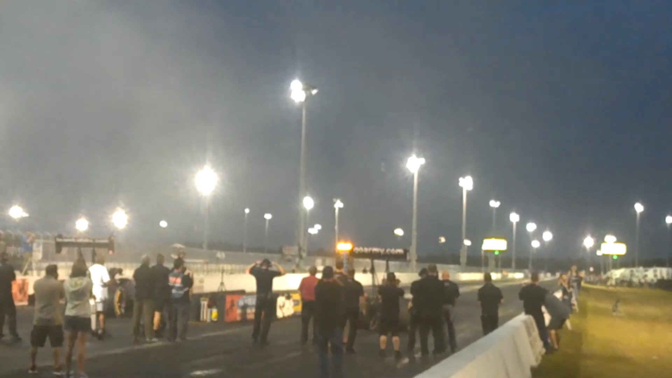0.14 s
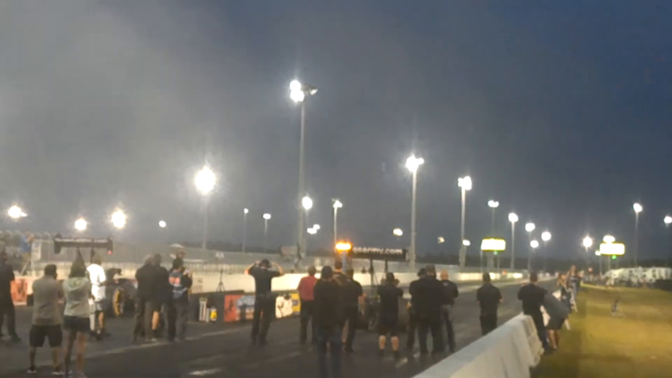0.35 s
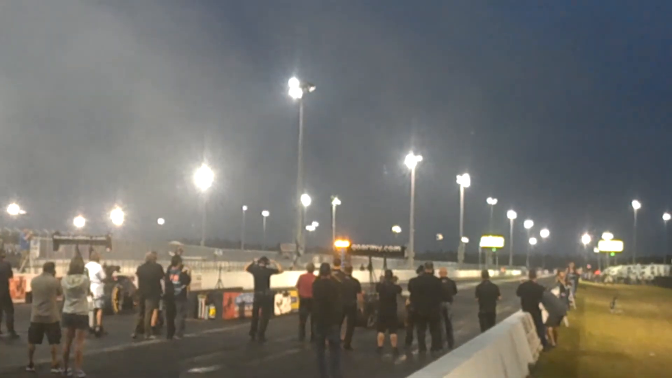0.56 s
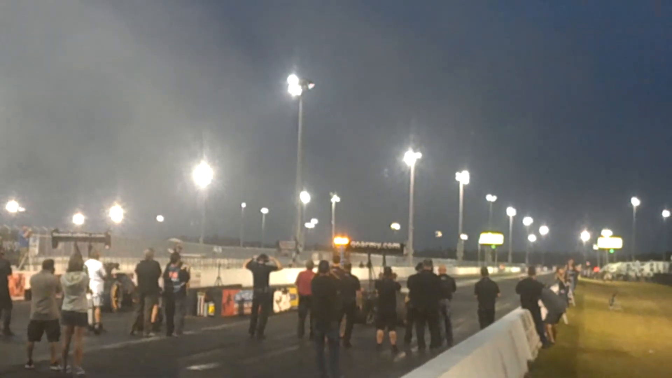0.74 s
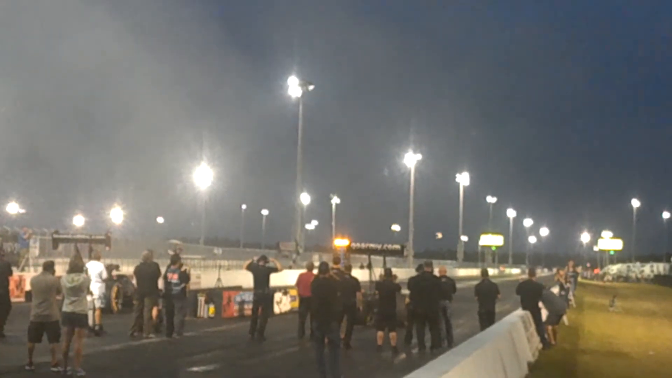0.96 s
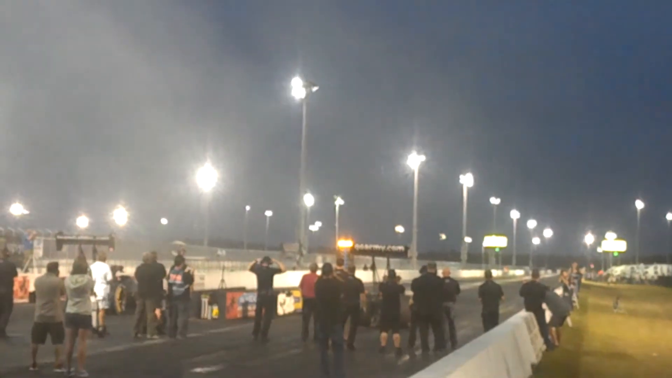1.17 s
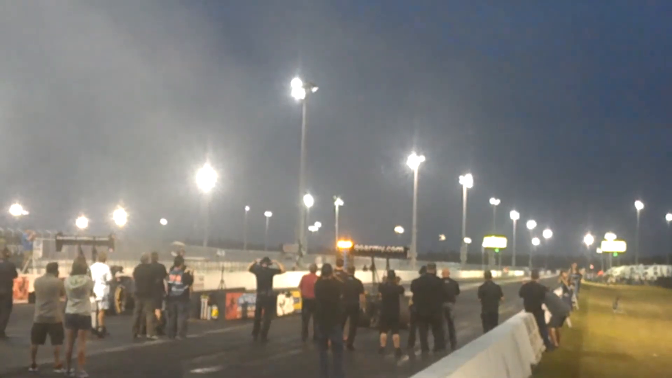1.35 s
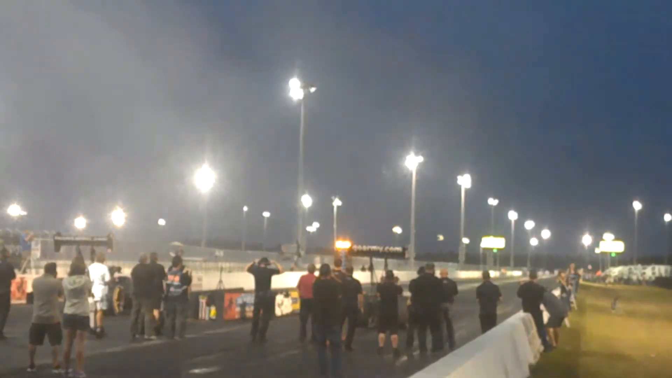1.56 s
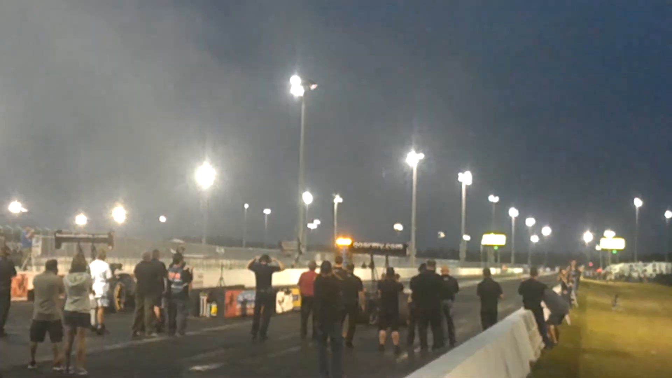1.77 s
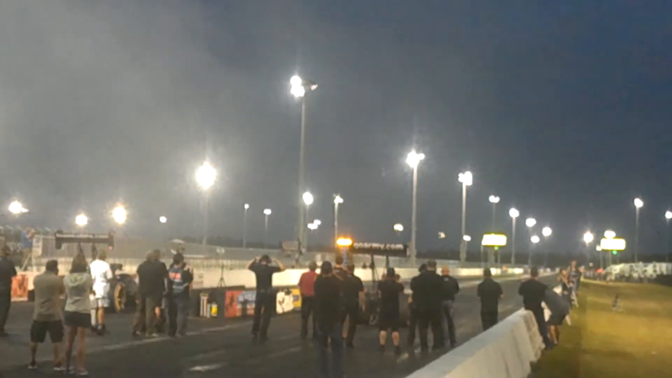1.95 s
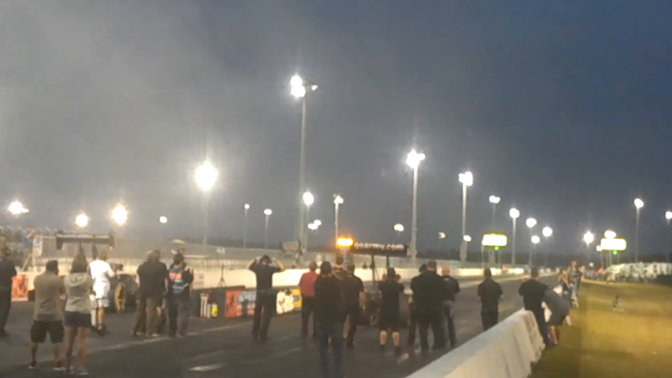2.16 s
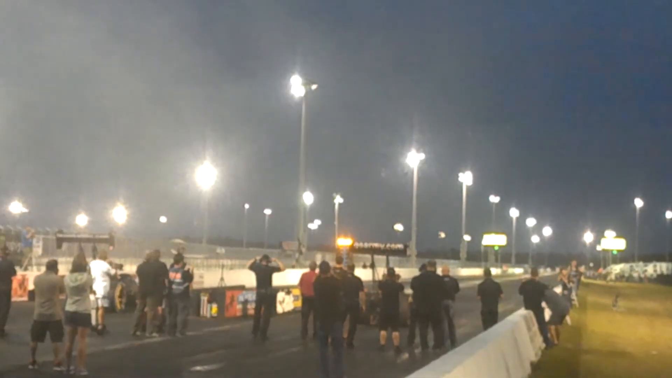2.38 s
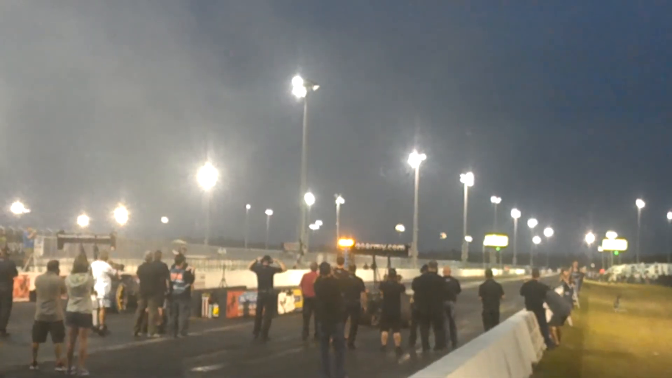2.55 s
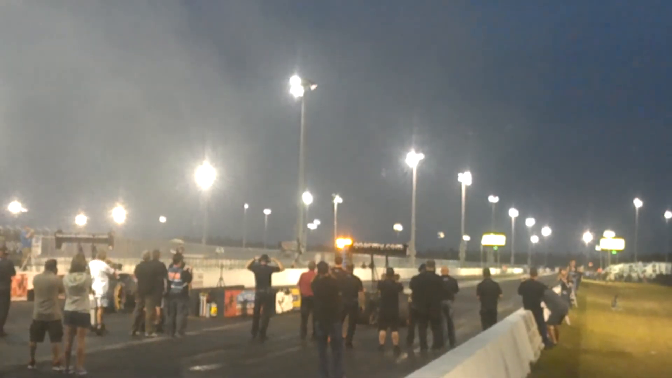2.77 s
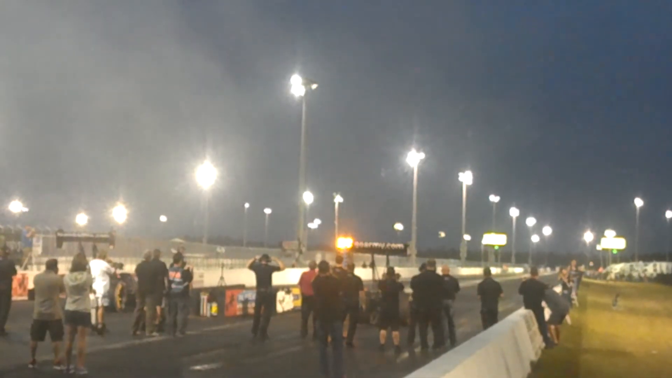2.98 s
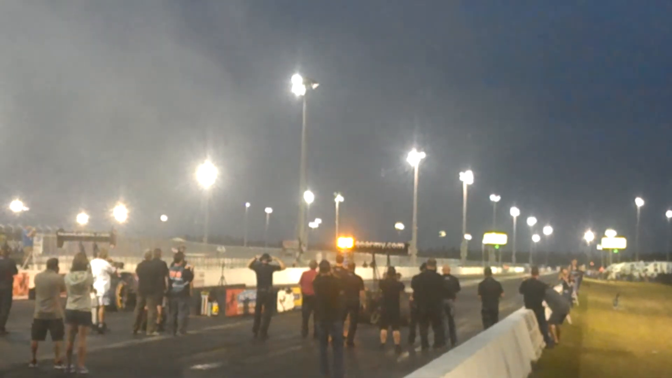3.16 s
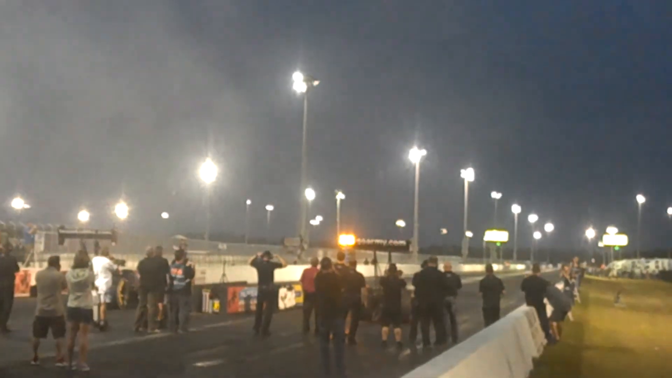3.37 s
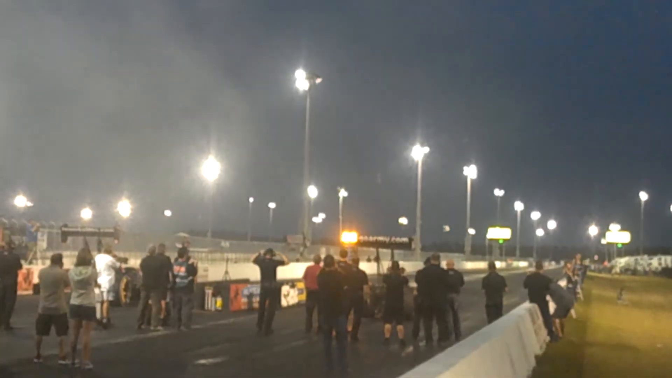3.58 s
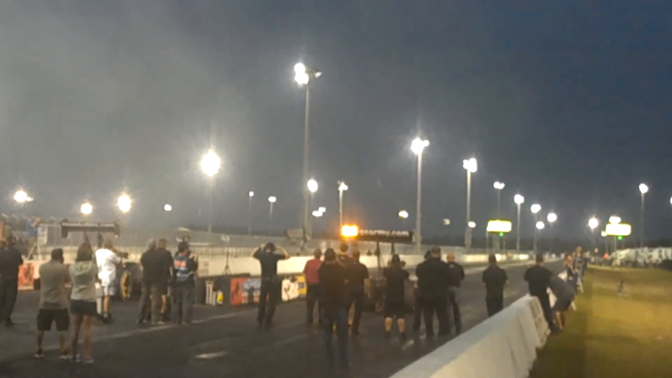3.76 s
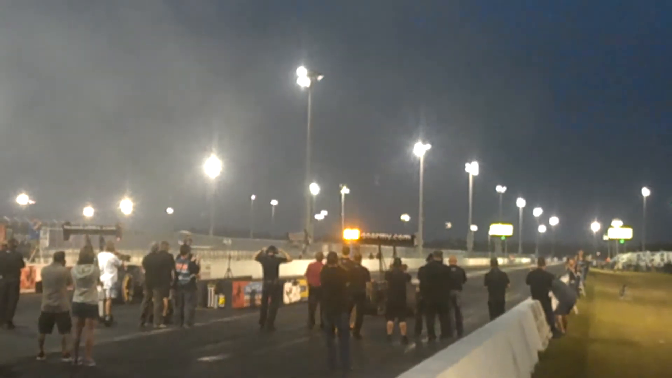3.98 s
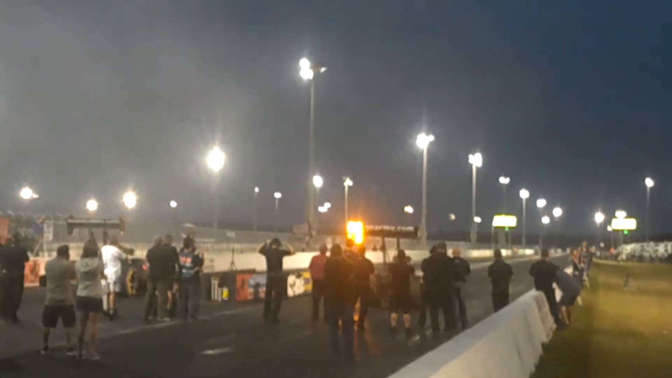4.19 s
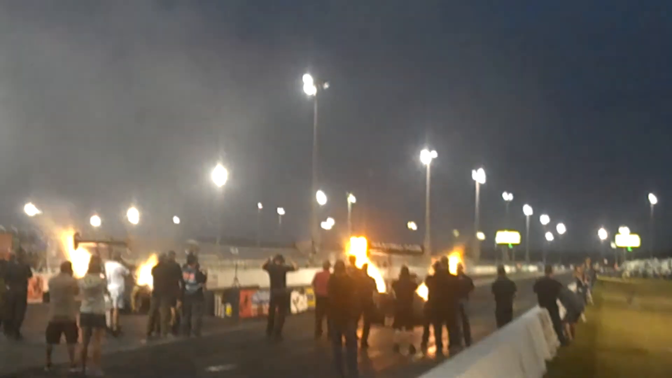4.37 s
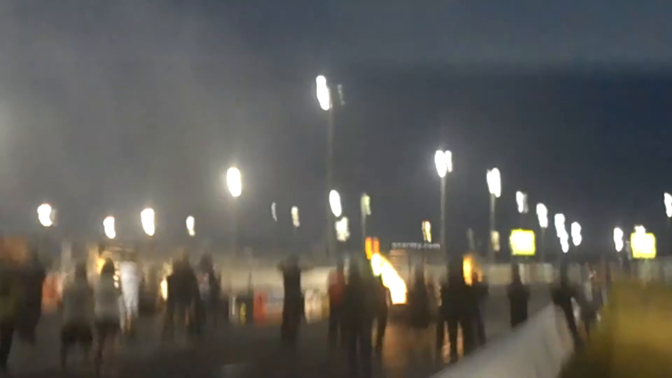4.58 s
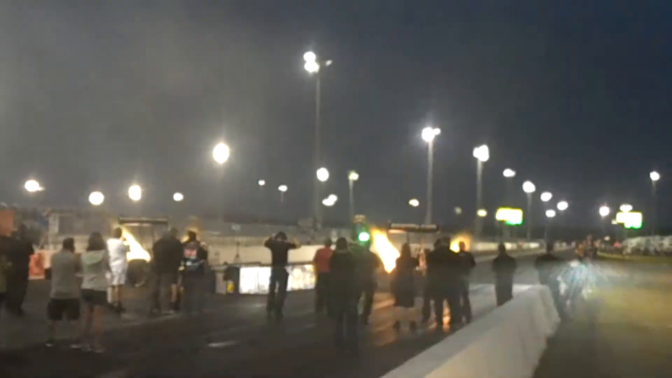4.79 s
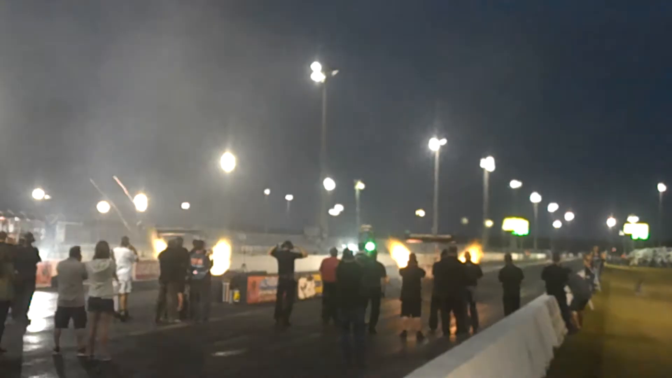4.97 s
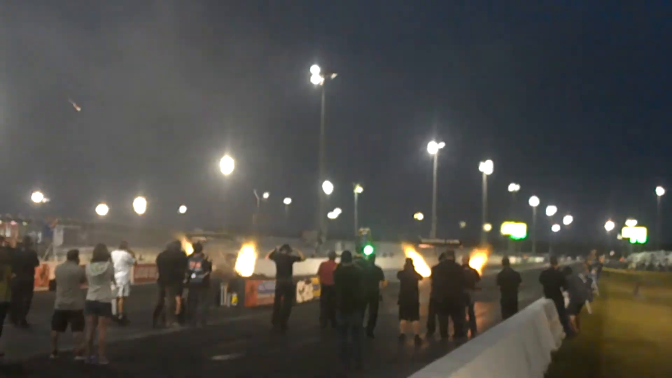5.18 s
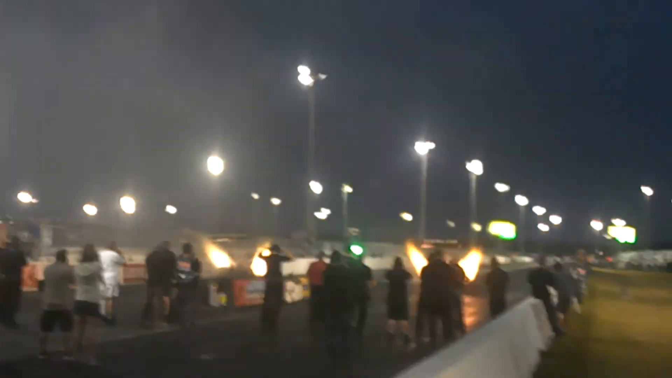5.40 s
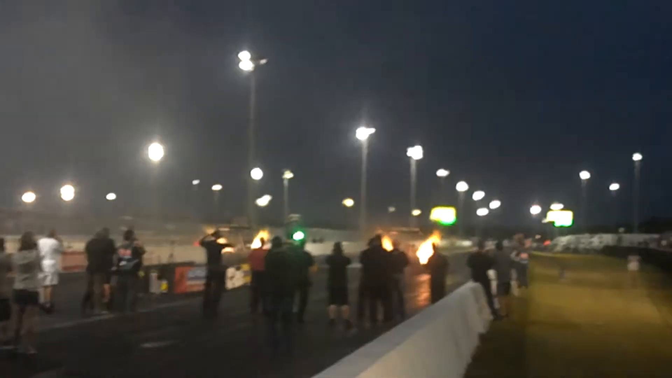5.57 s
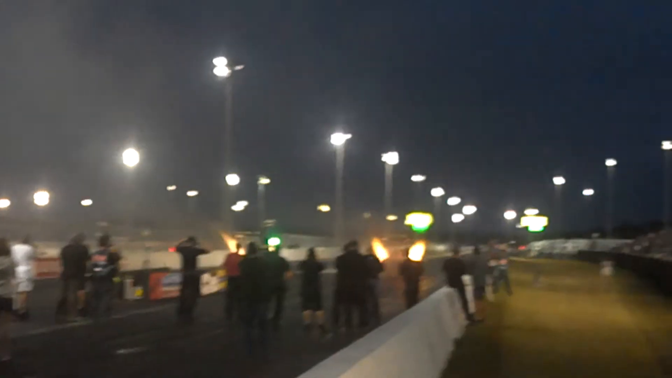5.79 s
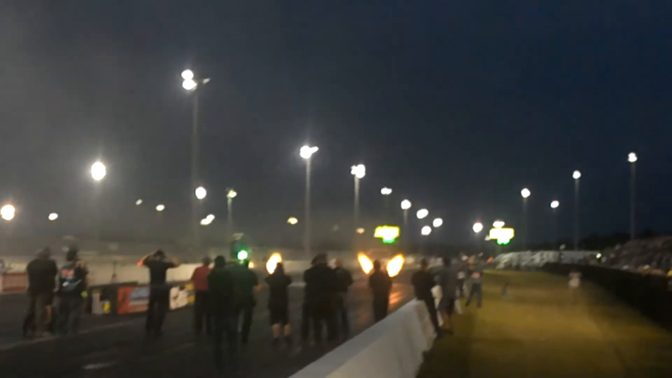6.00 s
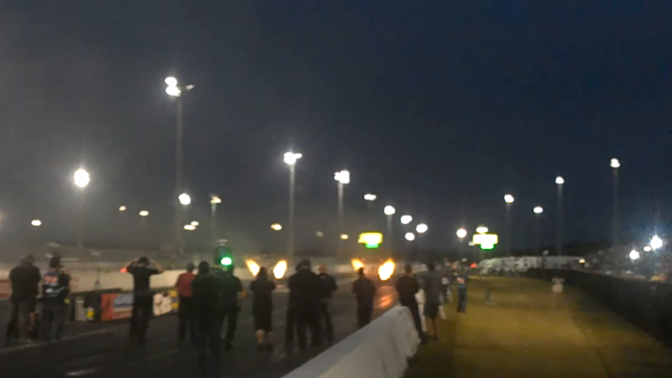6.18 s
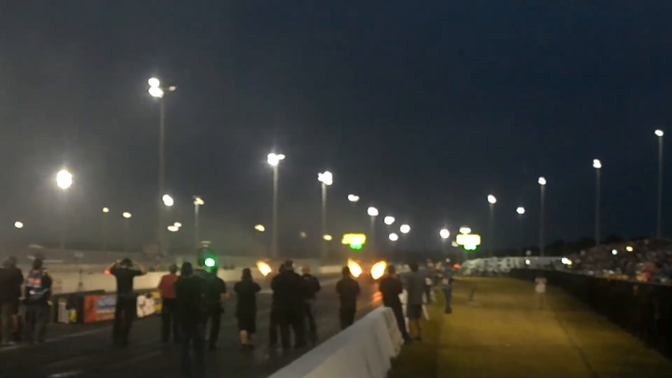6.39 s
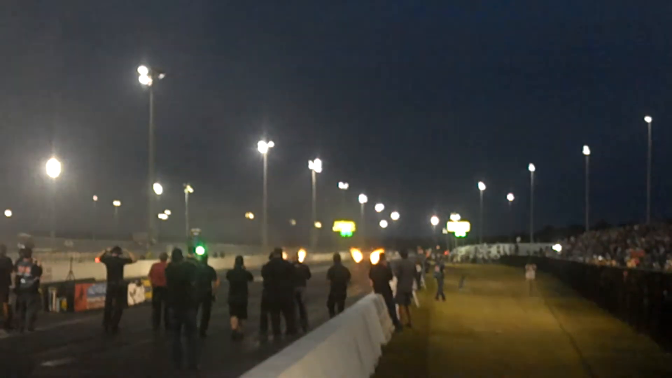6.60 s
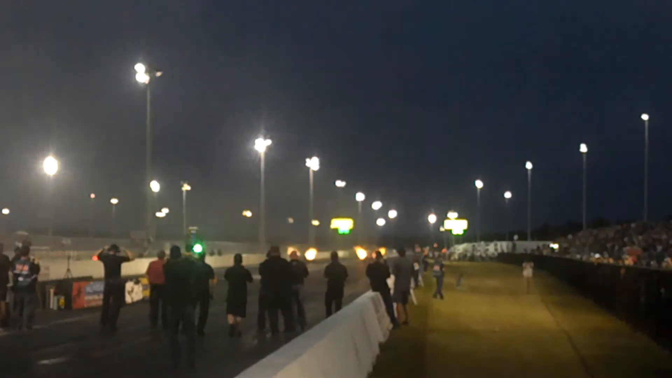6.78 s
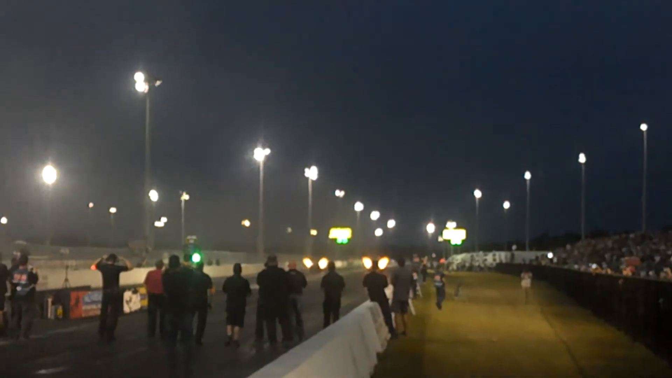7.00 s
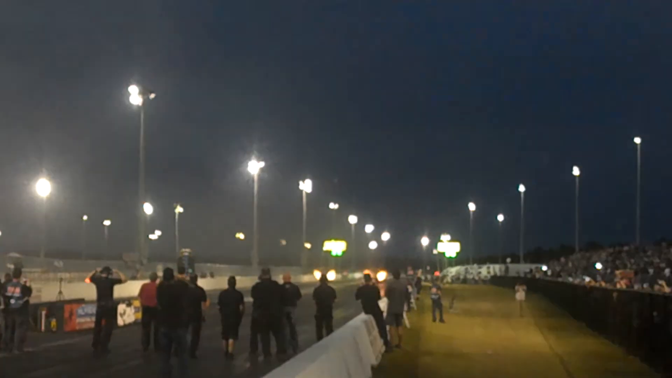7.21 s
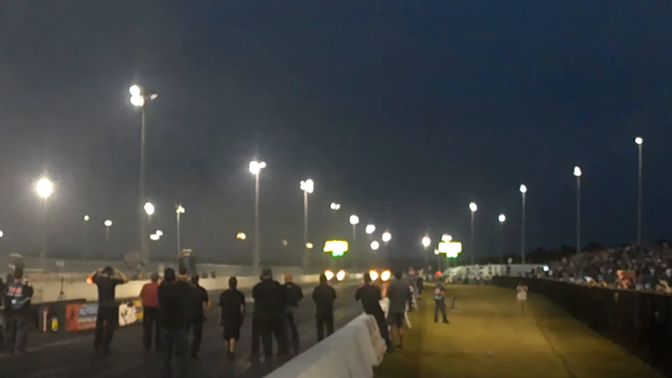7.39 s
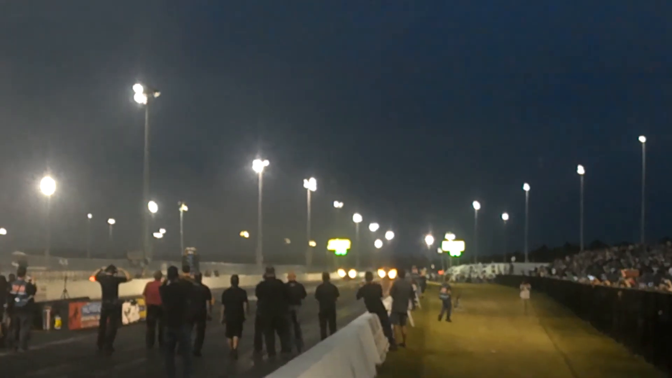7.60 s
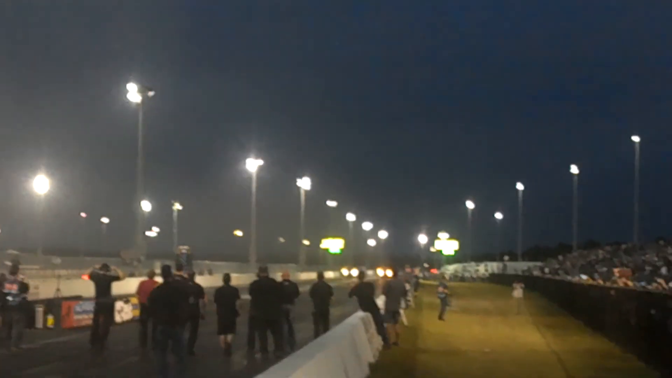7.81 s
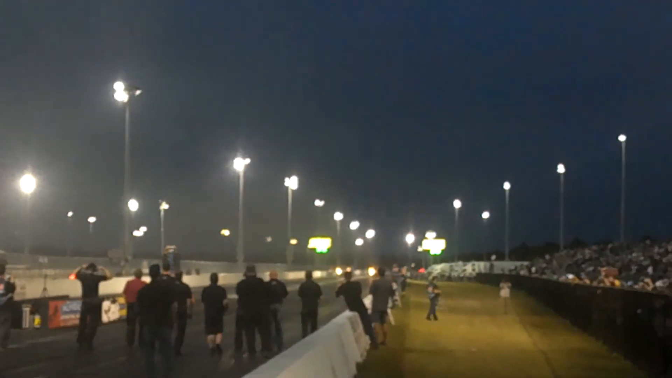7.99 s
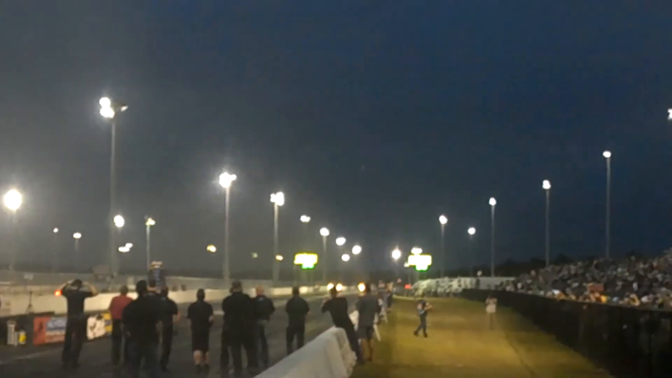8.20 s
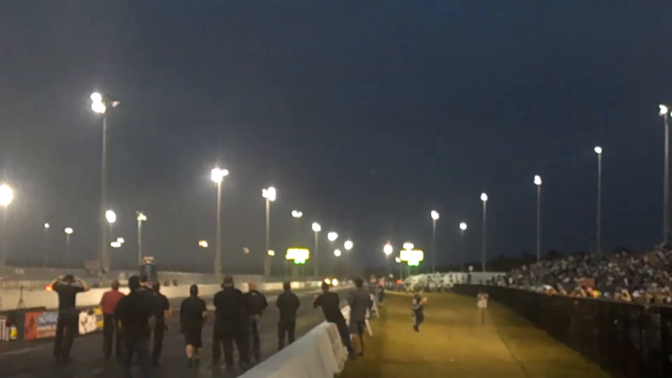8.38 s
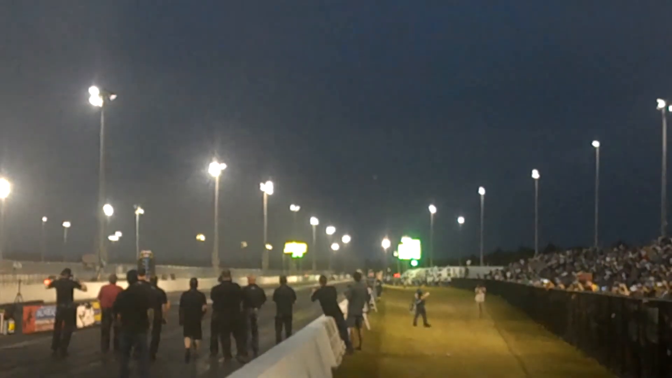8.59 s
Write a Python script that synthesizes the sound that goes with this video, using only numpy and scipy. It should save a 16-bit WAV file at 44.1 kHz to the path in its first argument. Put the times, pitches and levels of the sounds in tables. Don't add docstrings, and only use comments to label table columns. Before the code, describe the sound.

Loud uneven idle pops and spitting exhaust at a night strip, then a sudden distorted full-throttle blast, fading down the track into a lower, hollow drone.

```python
import sys
import numpy as np
from scipy import signal
from scipy.fft import rfft, irfft
from scipy.io import wavfile

SR = 44100
rng = np.random.default_rng(int(sys.argv[2]) if len(sys.argv) > 2 else 0)


def put_to_file(sound):
    columns = np.atleast_2d(sound).T
    safe = np.clip(columns, -1, 1)
    whole_steps = np.round(safe * 32767)
    wavfile.write(sys.argv[1], SR, whole_steps.astype(np.int16))


def ratio_of_db(decibels):
    return 10 ** (np.asarray(decibels, float) / 20)


N = 381465
size = 204800
t = np.arange(size) / SR
hz_axis = np.maximum(np.arange(size // 2 + 1) * SR / size, 1)
IDLE_CYCLE_HZ = 20.63
WIDEN_SAMPLES = 16
STACK_ORDERS = range(3, 14)

# (time [s], peak [dB], crack over thump [dB])
POPS = [(0.014, -13.5, -11), (0.035, -12, -14), (0.052, -18, -18), (0.071, -11.5, -16),
        (0.106, -10.5, -2.5), (0.151, -30, -12), (0.167, -11.5, -11), (0.205, -10.5, -12),
        (0.235, -9, -4), (0.302, -11, -20), (0.337, -22, -13.5), (0.356, -16, -8), (0.383, -13.5, -3),
        (0.432, -18, -24), (0.472, -18, -24), (0.483, -10, -18), (0.495, -11, -26), (0.53, -29, -22),
        (0.549, -17, -7), (0.589, -10, -6), (0.626, -13.5, -3), (0.686, -12, -12), (0.72, -12, -23),
        (0.739, -13, -16.5), (0.787, -11, -6), (0.818, -12, -17), (0.878, -12.5, -10),
        (0.918, -14.5, -9), (0.938, -11.5, -4.5), (1.022, -13, -25), (1.046, -14, -30),
        (1.058, -14, -14), (1.134, -17, -23), (1.145, -14, -23), (0.953, -15, -14), (1.177, -14, -14),
        (1.168, -37, -24), (1.168, -12.5, -6), (1.252, -9.5, -40), (1.307, -11, -7),
        (1.347, -12.5, -22), (1.364, -12, -17.5), (1.388, -12, -5), (1.45, -21, -15),
        (1.451, -15.5, -1),
        (1.525, -23, -14), (1.557, -23, -3), (1.557, -13.5, -6), (1.596, -13, -5),
               (1.653, -10.5, -12), (1.72, -25, -12), (1.747, -19, -7), (1.77, -27, -10.5),
               (1.799, -13, -10), (1.824, -14.5, -12), (1.846, -14.5, -14), (1.871, -15.5, -6.5),
               (1.9, -13.5, -7), (1.942, -14, -16), (1.978, -12.5, -17), (1.999, -11.5, -13),
               (2.036, -12, -11), (2.071, -16, -7), (2.095, -22, -1), (2.103, -15, -12), (2.134, -11.5, -9),
               (2.17, -10, -11), (2.201, -13.5, -10), (2.231, -21, -1), (2.255, -24, -1),
               (2.284, -10.5, -13.5), (2.324, -14, -5), (2.346, -29, -5), (2.359, -16, 0),
               (2.42, -14.5, -8), (2.452, -13, -15), (2.516, -15.5, -7), (2.561, -15.5, -13),
               (2.563, -15, -10.5), (2.604, -17, -8), (2.648, -17, -5), (2.678, -13, -10),
               (2.707, -13.5, -8), (2.729, -24, -8.5), (2.745, -22, 2), (2.762, -13, -10), (2.822, -22, -9),
               (2.822, -11.5, -12), (2.902, -11.5, -18), (2.936, -10, -17),
        (3.005, -36, -11), (3.046, -18, -9.5), (3.045, -10, -13), (3.104, -11.5, -7),
                (3.129, -11, -11), (3.148, -14.5, -3), (3.199, -11, -8), (3.243, -10.5, -6),
                (3.263, -18, -11), (3.306, -9.5, -19), (3.366, -21, -18), (3.404, -21, -15),
                (3.404, -14, -4), (3.429, -19, -13), (3.455, -13.5, -10), (3.48, -15, -21),
                (3.494, -10, -7), (3.526, -10, -10), (3.554, -9, -22), (3.587, -17, -17), (3.611, -22, -8),
                (3.62, -13, -13), (3.667, -11.5, -10), (3.725, -10, -2.5), (3.808, -10.5, -34),
                (3.856, -15, -28), (3.876, -13.5, -15), (3.9, -12, -11), (3.91, -15, -11),
                (3.948, -15, -13), (3.956, -12, -15), (3.977, -10, -13), (4.007, -12.5, -15),
                (4.049, -14, -8), (4.077, -17, -16), (4.108, -12, -9), (4.138, -15, -17),
                (4.167, -14.5, -17), (4.206, -14.5, -20), (4.294, -23.5, -15), (4.295, -13, -23),
                (4.32, -10.5, -27), (4.358, -22, -14.5), (4.398, -11, -16.5), (4.424, -15, -12),
                (4.436, -18, -4), (4.444, -9.5, -18), (4.452, -9, -13), (4.459, -12, -12), (4.465, -10, -5),
                (4.471, -13, -4), (4.48, -12, -2)]
# (time [s], peak [dB])
FUEL_SPITS = [(0.0707, -28), (0.1645, -21), (0.2611, -20), (0.3037, -29), (0.416, -28), (0.4334, -21),
              (0.4549, -25), (0.5901, -20), (0.6454, -24), (0.6868, -28.5), (0.7043, -22), (0.7213, -21),
              (0.847, -19), (0.8789, -28), (0.9148, -20), (1.3009, -28), (1.5259, -25), (1.5439, -25),
              (1.6227, -21), (1.6422, -24), (1.7843, -25), (1.8153, -19), (1.8457, -30.5), (1.8831, -21),
              (1.943, -30), (1.9794, -23), (1.9974, -18), (2.1031, -21), (2.134, -30), (2.2648, -25),
              (2.36, -33), (2.3905, -23), (2.4204, -30), (2.4773, -23), (2.5531, -28), (2.6125, -22),
              (2.6688, -20), (2.9362, -31.5), (2.9557, -20.5), (3.2066, -23), (3.3029, -22), (3.9769, -24),
              (4.0726, -25), (4.1679, -25)]
# (time [s], peak [dB])
FLAME_RASPS = [(0.0722, -30), (0.2379, -22), (0.5686, -20), (0.6459, -24), (0.8794, -26), (0.9203, -28),
               (0.9457, -24), (1.066, -20), (1.1348, -29), (1.2451, -21), (1.4591, -38), (1.478, -27),
               (1.5574, -23), (1.5993, -27), (1.6536, -24), (1.8467, -28), (1.9016, -26), (2.0393, -29),
               (2.0737, -24), (2.1355, -32), (2.1725, -30), (2.36, -29), (2.7097, -26), (2.9372, -30),
               (3.1053, -32), (3.1996, -30), (3.2375, -23), (3.3054, -29), (3.457, -27), (3.4965, -27),
               (3.6117, -29), (3.6626, -31), (3.6815, -31), (4.0906, -28), (4.2822, -33), (4.2956, -32)]
# (time [s], level [dB])
IDLE_THROTTLE = [
    (0, 2.5),
    (.6, 0),
    (4.2, 1),
    (4.29, -0.5),
    (4.33, 0.5),
    (4.36, 1),
    (4.44, -1),
    (4.47, 6),
    (4.5, -14),
]
# (time [s], engine cycles [Hz], level [dB], share of the strip's air loss [0-1])
FULL_THROTTLE = [(4.42, 66.6, -47, 0.3), (4.47, 66.6, -21, 0.1), (4.56, 66.66, -21, 0.04),
                 (4.8, 68.2, -21.5, 0), (5.35, 64.85, -20.5, 0.03), (5.49, 59.3, -19, 0.11),
                 (5.75, 59.93, -19.5, 0.1), (5.88, 61.54, -17, 0.11), (6.05, 58.63, -19, 0.26),
                 (6.28, 54.94, -17.5, 0.26), (6.5, 51.57, -19, 0.33), (6.85, 48.17, -20.5, 0.59),
                 (7.0, 47.95, -21.5, 0.69), (7.24, 45.4, -20.5, 0.78), (7.47, 44.16, -22, 0.89),
                 (7.84, 45.06, -23, 0.82), (8.3, 46.16, -23.5, 1), (8.65, 46.66, -24.5, 0.89)]
# (time [s], share [0-1])
CLEAN_SHARE = [
    (4.44, 0.6),
    (4.55, 0.14),
    (5.6, 0),
    (5.9, 0.22),
    (6.5, 0.72),
    (7, 0.97),
    (8.65, 0.89),
]
# (time [s], level [dB])
JOLTS = [(4.519, -46), (4.661, -57), (4.769, -59), (5.369, -40), (5.469, -63), (5.729, -35), (5.834, -36),
         (5.909, -52), (6.024, -30), (6.049, -30), (6.119, -33), (6.214, -37), (6.279, -45), (6.389, -50),
         (6.549, -50), (6.756, -42), (6.999, -36), (7.149, -44), (7.339, -43)]
# (time [s], peak [dB])
FAR_BARKS = [(6.457, -4), (6.682, -6.5), (6.939, -11), (6.987, -6.5), (7.092, -9), (7.168, -5),
             (7.267, -12), (7.312, -8.5), (7.365, -10), (7.512, -11), (7.785, -10)]
# (from [s], to [s], level [dB])
ORDER_SWELLS = [(4.5, 5.15, -32), (5.35, 6.45, -31.5), (4.5, 4.75, -34), (5.65, 6.2, -32), (6.25, 6.7, -33),
                (6.75, 7.25, -29), (7.45, 8.7, -29), (3.8, 4.1, -34), (4.72, 5.0, -30), (6.4, 6.85, -26.5),
                (7.0, 7.6, -29), (7.95, 8.05, -30), (8.22, 8.7, -29), (4.44, 4.48, -20.5),
                (5.524, 6.8, -37), (6.4, 6.85, -25), (7.0, 8.05, -31), (8.1, 8.7, -30), (4.5, 5.45, -29),
                (6.2, 8.5, -32.5), (6.25, 7.4, -30.5), (7.88, 8.2, -26), (8.35, 8.7, -28.5),
                (5.8, 7.5, -25), (6.85, 7.85, -26.5), (8.05, 8.4, -25), (6.45, 6.6, -21.5), (6.6, 7.7, -34),
                (7.7, 8.05, -25.5), (7.95, 8.7, -30.5), (6.8, 8.05, -33), (8.15, 8.7, -34),
                (7.4, 7.75, -27), (8.15, 7.6, -29), (7.4, 7.8, -33.5), (8.05, 8.7, -28), (8.0, 8.4, -27),
                (8.4, 8.7, -31), (6.75, 7.0, -26)]
ORDERS_OF_SWELLS = (2, 2, 3, 3, 3, 3, 3, 4, 4, 4, 4, 4, 4, 5, 5, 5, 5, 6, 7, 7, 8, 8, 8, 9, 10, 10, 11, 11,
                    12, 13, 6, 6, 7, 7, 8, 9, 11, 13, 6)
# (centre time [s], length [s], level [dB])
ORDER_FLARES = [(4.465, 0.039, -35), (4.48, 0.05, -38), (4.492, 0.047, -25), (4.53, 0.057, -18),
                (4.668, 0.055, -24), (4.674, 0.06, -17), (4.687, 0.094, -24), (4.833, 0.084, -35),
                (4.854, 0.068, -28), (4.864, 0.19, -35), (4.914, 0.05, -29), (4.936, 0.085, -17.5),
                (4.939, 0.07, -25), (5.004, 0.07, -19.5), (5.191, 0.11, -25.5), (5.208, 0.22, -25),
                (5.226, 0.059, -19), (5.364, 0.068, -14), (5.423, 0.035, -25), (5.589, 0.048, -14),
                (5.592, 0.051, -21), (5.601, 0.13, -21), (5.602, 0.05, -21), (5.61, 0.057, -16.5),
                (5.719, 0.045, -17), (5.739, 0.078, -17), (5.764, 0.12, -22.5), (5.862, 0.042, -23.5),
                (5.864, 0.0839, -18), (5.874, 0.03, -18), (5.879, 0.025, -14.5), (5.907, 0.031, -24),
                (5.959, 0.055, -26), (6.001, 0.075, -26.5), (6.139, 0.031, -20), (6.317, 0.11, -16.5),
                (6.43, 0.091, -21), (6.512, 0.069, -22), (6.56, 0.059, -22), (6.65, 0.1, -18.5),
                (6.756, 0.085, -17), (7.066, 0.11, -23), (7.177, 0.06, -19), (7.23, 0.057, -27),
                (7.306, 0.17, -23), (7.334, 0.064, -23), (7.338, 0.32, -25.5), (7.453, 0.065, -20),
                (7.746, 0.039, -17), (7.799, 0.27, -19.5), (7.869, 0.06, -23), (8.033, 0.26, -18),
                (8.234, 0.045, -17), (8.304, 0.065, -19), (8.356, 0.35, -29), (8.52, 0.15, -26)]
ORDERS_OF_FLARES = (5, 11, 13, 6, 3, 6, 5, 4, 7, 2, 4, 12, 11, 6, 3, 5, 8, 7, 16, 6, 8, 5, 11, 9, 7, 6, 3,
                    5, 6, 7, 8, 9, 11, 3, 3, 3, 4, 6, 5, 3, 11, 4, 7, 5, 11, 5, 4, 7, 10, 4, 12, 8, 10, 8,
                    4, 3)
IDLE_FIRING_DB = [-0.5, -1, -0.5, -2, 3, 3.5, 3, -6, 1.5, 3, 3, -1.5, 1, 5.5, -43, -6.5]
RACE_FIRING_DB = [3, -41, -7.5, -15, -13, -4, -31, -37]
# (frequency [Hz], level [dB])
IDLE_PIPE_COLOUR = [(40, -40), (85, -7.5), (120, 0.5), (165, 3), (250, -3.5), (335, -7), (372, -11.5),
                    (440, -12), (520, -10.5), (625, -11), (670, -18.5), (1250, -21.5), (1900, -31),
                    (3000, -44.5), (8000, -35.5), (15500, -51), (16200, -110)]
# (frequency [Hz], level [dB])
IDLE_GAS_COLOUR = [(600, -51), (1500, -5.5), (2200, 0), (3500, -8.5), (6000, -6), (8400, -16), (10000, -2),
                   (12000, -9.5), (15500, -23), (16200, -49)]
# (frequency [Hz], level [dB])
RACE_PIPE_COLOUR = [(40, -32), (85, -6), (130, -1), (350, -1.5), (700, -9.5), (1500, -12), (3000, -20),
                    (6000, -24), (8200, -30), (10000, -28.5), (15700, -43), (16400, -83)]
# (frequency [Hz], likeness [0-1], lag [rad], level [dB])
PORT_DIFFERENCE = [(24.98, 0, 1.1, 20.5), (70, 0.79, 0.83, 2), (153, 1, 0.63, -2.5), (450, 0.98, 0.64, 1),
                   (730, 0.93, 1.08, 0), (1070, 0.77, 1.4, -1), (1520, 0.99, 2.127, 4),
                   (2300, 0.02, 3.3, -1), (4130, 0.04, 9.8, -0.5), (10600, 0.03, 3, 0.5)]


def curves(table, start=0, levels_from=1):
    s, *columns = np.transpose(table)
    outside = (t + start < s[0]) | (t + start > s[-1])
    return [np.interp(t + start, s, c) - 200 * outside * (k >= levels_from) for k, c in enumerate(columns)]


def on_axis(table, column=1):
    rows = np.array(table)
    return np.interp(np.log(hz_axis), np.log(rows[:, 0]), rows[:, column])


def apply(x, response):
    return irfft(rfft(x) * response)


def colour(table):
    cepstrum = irfft(on_axis(table) * np.log(10) / 20)
    cepstrum[1:size // 2] *= 2
    cepstrum[size // 2 + 1:] = 0
    return np.exp(rfft(cepstrum))


def band(lo_hz, hi_hz):
    return 1 / (1 + (hz_axis / hi_hz) ** 6) - 1 / (1 + (hz_axis / lo_hz) ** 6)


def widened(hz):
    return 2 * np.sin(np.pi * hz * WIDEN_SAMPLES / SR)


def heard(spectrum):
    return irfft(spectrum) * size / np.sqrt(np.sum(np.abs(spectrum * widened(hz_axis)) ** 2))


def noise():
    return rng.standard_normal((2, size))


def clicks(at, height):
    whole = np.clip(at.astype(int), 0, size - 2)
    return np.bincount(whole, height * (1 - at % 1), size) + np.bincount(whole + 1, height * (at % 1), size)


def firings(cycle_hz, pattern_db, scatter_db, jitter):
    turns = np.cumsum(8 * cycle_hz / SR)
    k = np.arange(1, int(turns[-1]))
    early_late, strength = rng.standard_normal((2, len(k)))
    at = np.interp(k + jitter * early_late, turns, t * SR)
    level_db = np.array(pattern_db)[k % len(pattern_db)] + scatter_db * np.minimum(strength, 0.8)
    return clicks(at, ratio_of_db(level_db))


def puffs(pulses, decay_s):
    rise, fall = np.exp(-1 / (0.0013 * SR)), np.exp(-1 / (decay_s * SR))
    return signal.lfilter([1 - rise], np.convolve([1, -rise], [1, -fall]), pulses) * noise()


def bursts(table, gain_db, delay_s, decay_s, lo_hz, hi_hz, start=0):
    s, db = np.transpose(table)
    pulses = clicks((s - start + delay_s) * SR, ratio_of_db(db + gain_db))
    return apply(puffs(pulses, decay_s), band(lo_hz, hi_hz))


def strip(wet_db, t60_s):
    late = t[:SR // 2]
    tail = rng.standard_normal((2, SR // 2)) * np.exp(-np.log(1000) * late / t60_s) * (late > .003)
    return 1 + ratio_of_db(wet_db) * rfft(tail / np.sqrt(np.sum(tail ** 2) / 2), size)


def night_air():
    return ratio_of_db(-66) * heard(rfft(noise()) * band(14200, 15600))


def shudder(start):
    s, db = np.transpose(JOLTS)
    other_port = -0.37
    pushes = clicks((s - start + 0.0076) * SR, ratio_of_db(db)) * np.array([[1], [other_port]])
    racing = t + start > FULL_THROTTLE[0][0]
    tremble = ratio_of_db(-69) * racing * heard(rfft(noise()) * band(30, 130))
    return ratio_of_db(-46) * heard(rfft(pushes) * band(22, 99)) + tremble


def idle_rumble(throttle_db):
    return ratio_of_db(-73.5 + throttle_db) * heard(rfft(noise()) * band(32, 90))


def idle_hum(throttle_db):
    hz = 161.1
    wobble = np.interp(t, np.arange(0, 5, .04), rng.standard_normal(125))
    gain = ratio_of_db(-36.5 + throttle_db + 2.5 * wobble) / widened(hz)
    return gain * np.sin(2 * np.pi * hz * t + 0.66 * wobble)


def idle_gas(fire, pops, throttle_db):
    gas = rfft(puffs(fire + 22 * pops, 0.0065) + 2.4 * noise()) * colour(IDLE_GAS_COLOUR)
    surge_db = 2 * np.sin(np.pi * IDLE_CYCLE_HZ * t + 0.38)
    crackle = ratio_of_db(-35.5 + 0.8 * throttle_db) * heard(gas * band(850, 6060))
    hiss = ratio_of_db(-40.5 + 0.19 * throttle_db + surge_db) * heard(gas * band(3800, 13470))
    return crackle + hiss


def idle_lope(fire, pipes, throttle_db):
    pulses = fire + 0.089 * puffs(fire, 0.0057)
    return ratio_of_db(-26.54 + throttle_db) * heard(rfft(pulses) * strip(-11.5, 0.21) * pipes)


def pop_rows():
    s, db, crack_db = np.array(POPS).T
    return s, 1.1 * (db + 14) - 16.5, crack_db


def pop_thumps(s, pop_db, pipes):
    push_s = 0.00034
    total = 0
    for k in range(5):
        pushes = clicks((s[k::5] + 0.001994) * SR, ratio_of_db(pop_db[k::5]))
        total = total + rfft(pushes) * strip(-1.9, 0.045)
    return ratio_of_db(44) * irfft(total * pipes / (1 + 2j * np.pi * hz_axis * push_s))


def pop_cracks(s, db):
    pulses = clicks((s + 0.00053) * SR, ratio_of_db(db))
    return ratio_of_db(10) * apply(puffs(pulses, 0.0036), strip(-1.9, 0.17) * band(570, 1800))


def idle():
    throttle_db = curves(IDLE_THROTTLE, levels_from=0)[0]
    steady = np.full(size, IDLE_CYCLE_HZ)
    rival = firings(.965 * steady, IDLE_FIRING_DB[::-1], 3.5, 0.0877)
    fire = firings(steady, IDLE_FIRING_DB, 7.1, 0.1) + 0.78 * rival
    s, pop_db, crack_db = pop_rows()
    pops = clicks((s + 0.002) * SR, ratio_of_db(pop_db))
    pipes = colour(IDLE_PIPE_COLOUR)
    out = idle_rumble(throttle_db) + idle_hum(throttle_db) + idle_gas(fire, pops, throttle_db)
    out = out + bursts(FUEL_SPITS, 3.5, 0.00044, 0.0032, 7000, 11600)
    out = out + bursts(FLAME_RASPS, 4.5, 0.00061, 0.0033, 1080, 4550)
    out = out + idle_lope(fire, pipes, throttle_db)
    return out + pop_thumps(s, pop_db, pipes) + pop_cracks(s, pop_db + crack_db)


def flares(start, cycle_hz, phase):
    out = np.zeros(size)
    for k, (s, length, db) in zip(ORDERS_OF_FLARES, ORDER_FLARES):
        near = slice(max(int((s - start - .5) * SR), 0), int((s - start + .5) * SR))
        bell = np.exp(-2.4 * ((t[near] + start - s) / length) ** 2)
        gain = ratio_of_db(db - 1.5) * bell / widened(k * cycle_hz[near])
        out[near] += gain * np.sin(k * phase[near] + k * k)
    return out


def drone(start, clean):
    cycle_hz, roar_db, _ = curves(FULL_THROTTLE, start)
    phase = 2 * np.pi * np.cumsum(cycle_hz) / SR
    orders = []
    for k, (begin, end, db) in zip(ORDERS_OF_SWELLS, ORDER_SWELLS):
        corners = [begin - .03, begin + 0.021, end - .03, end + 0.013]
        orders.append((k, np.interp(t + start, corners, [0, ratio_of_db(db), ratio_of_db(db), 0])))
    orders += [(k, ratio_of_db(roar_db - 13) * (0.23 + 0.58 * clean ** 2)) for k in STACK_ORDERS]
    orders += [(k * 1.045, ratio_of_db(roar_db - 17.5) * clean) for k in STACK_ORDERS[2:]]
    out = flares(start, cycle_hz, phase)
    knots = np.arange(0, t[-1] + .1, .035)
    wander = np.interp(t, knots, rng.standard_normal(len(knots)))
    phase = phase + 0.33 * (1.2 - clean) * wander
    depth_db = 2.4 + 1.6 * (1 - clean)
    for k, gain in orders:
        wave = np.interp(t, knots, rng.standard_normal(len(knots)))
        flutter = ratio_of_db(depth_db * (0.96 + 0.044 * k) * wave)
        out = out + gain * flutter / widened(k * cycle_hz) * np.sin(k * phase + k * k)
    return out


def race(start, clean):
    cycle_hz, roar_db, _ = curves(FULL_THROTTLE, start)
    far = curves(FULL_THROTTLE, start, levels_from=3)[2]
    top_db = roar_db - 600 * np.maximum(4.482 - t - start, 0)
    rival = firings(1.03 * cycle_hz, RACE_FIRING_DB[::-1], 8.4, 0.11)
    fire = firings(cycle_hz, RACE_FIRING_DB, 1.2, 0.037) + 0.7 * rival
    gas = 0.15 * puffs(fire, 0.0056) + 0.2 * (1.05 - clean) * noise()
    blast = rfft(fire + gas) * strip(-7.5, 0.685) * colour(RACE_PIPE_COLOUR)
    boom = ratio_of_db(roar_db - 2.4 + 9 * clean) * heard(blast * band(45, 825))
    boom = boom - (1 - ratio_of_db(-3.5 * far ** 2)) * apply(boom, band(20, 380))
    roar = ratio_of_db(roar_db + 2) * heard(blast * band(687, 3540))
    rasp = ratio_of_db(top_db - 1.5 - 16 * far) * heard(blast * band(2420, 8150))
    sizzle = ratio_of_db(top_db - 4.5 - 37 * far) * heard(blast * band(8360, 28000))
    return boom + roar + rasp + sizzle + bursts(FAR_BARKS, 7, 0.000505, 0.0037, 380, 1900, start)


def ports(pair, clean, tones):
    first, other = rfft(pair)
    alike = np.clip(on_axis(PORT_DIFFERENCE), 0, 1)
    lag = np.exp(-1j * on_axis(PORT_DIFFERENCE, column=2))
    gain = ratio_of_db(on_axis(PORT_DIFFERENCE, column=3))
    shared = irfft(gain * (alike * lag * first + np.sqrt(1 - alike ** 2) * other))
    second = clean * shared + np.sqrt(1 - clean ** 2) * pair[1] + apply(tones, gain * lag)
    return np.array([pair[0] + tones, second * ratio_of_db(-8 * (1 - clean))])


def scene():
    out, start = np.zeros((2, N)), (N - size) / SR
    clean = np.clip(curves(CLEAN_SHARE, start)[0], 0, 1)
    out[:, :size] += ports(idle(), 1.0, np.zeros(size))
    leaving = night_air() + shudder(start) + race(start, clean)
    out[:, -size:] += ports(leaving, clean, drone(start, clean))
    return out


def band_limit(x):
    return signal.sosfilt(signal.butter(12, 17080, fs=SR, output="sos"), x)


def record(dry):
    crossed = np.pad(dry, ((0, 0), (WIDEN_SAMPLES, 0)))[::-1, :N]
    wide = dry - crossed
    wide = wide + 0.11 * wide.mean(axis=0) * np.array([[-1], [1]])
    balance = ratio_of_db(np.array([[-.5], [.5]]) * 0.87)
    limited = np.tanh(0.72 * wide * balance) / 0.69
    top_cut = signal.ellip(10, .1, 80, 15750, fs=SR, output="sos")
    mix = np.clip(signal.sosfilt(top_cut, limited), -1, 1)
    return band_limit(mix)


dry = scene()
out = record(dry)
put_to_file(out)
```